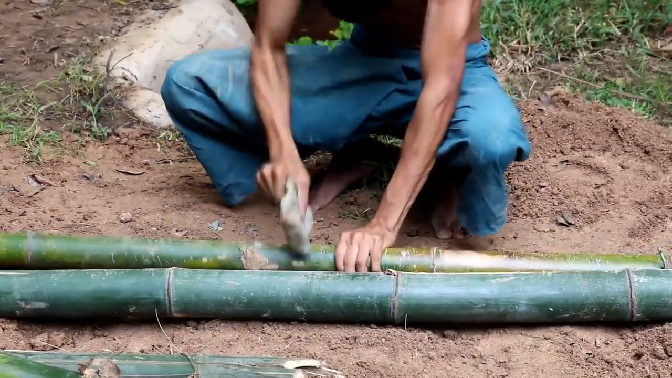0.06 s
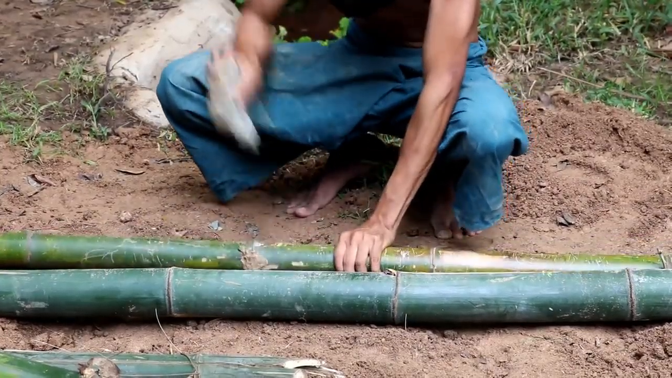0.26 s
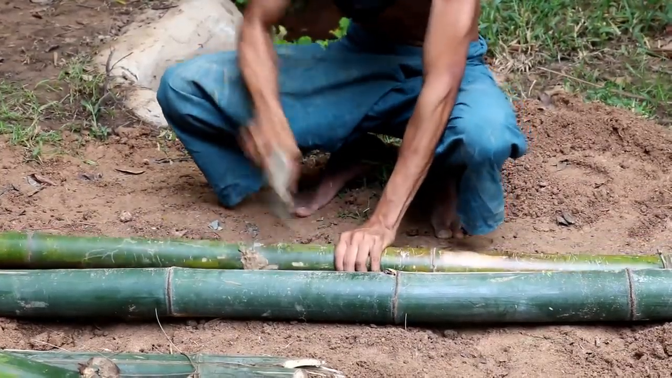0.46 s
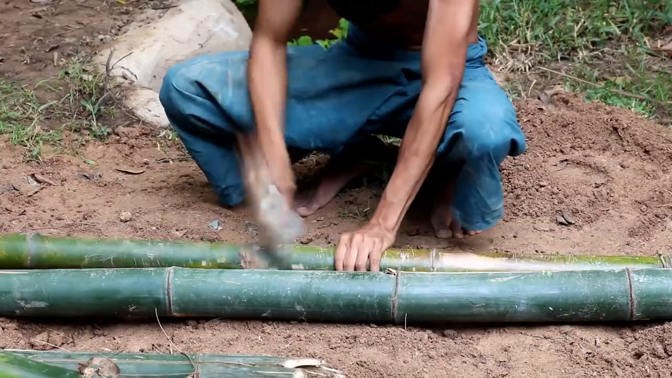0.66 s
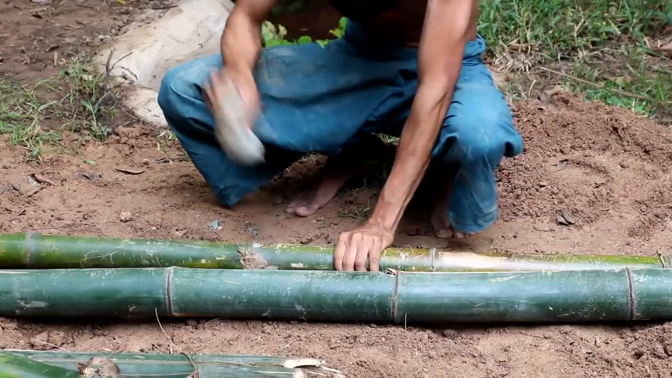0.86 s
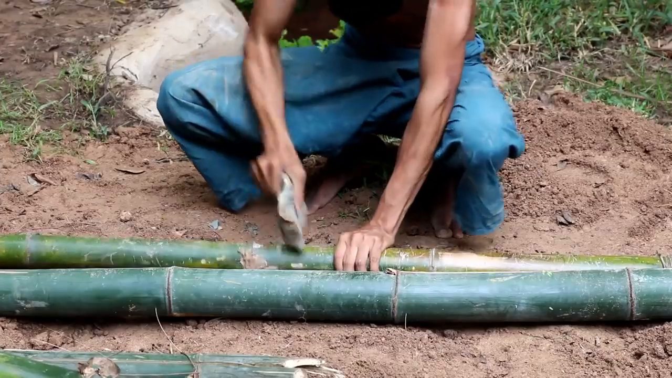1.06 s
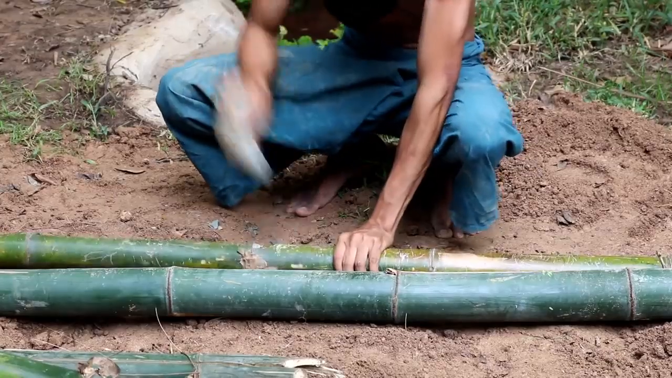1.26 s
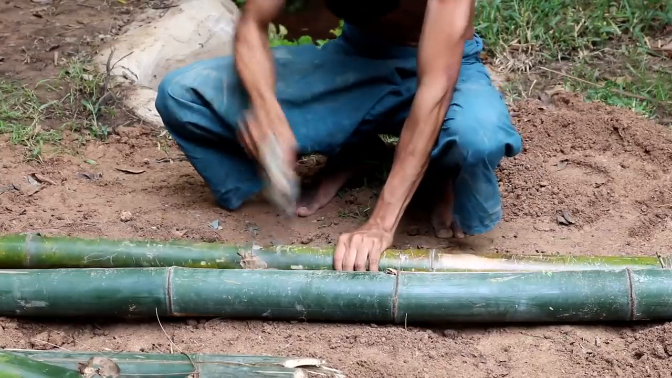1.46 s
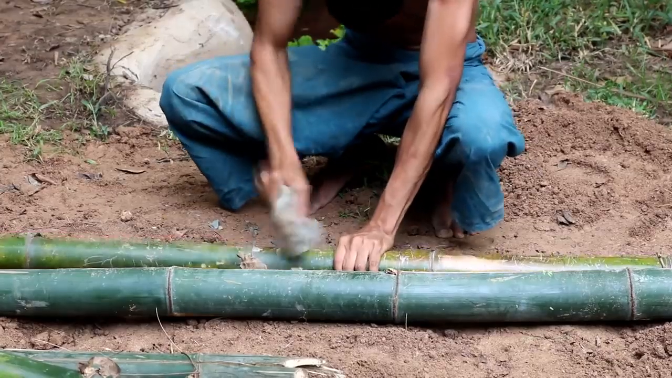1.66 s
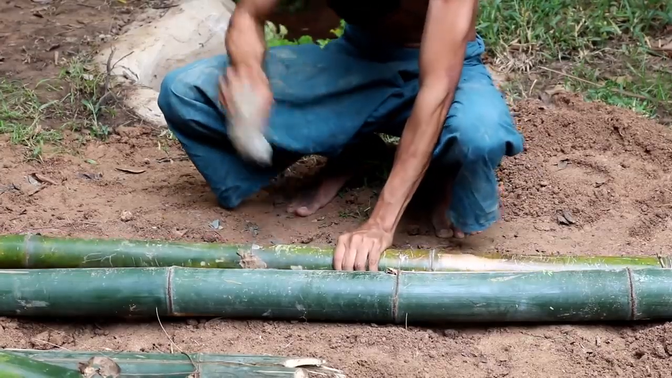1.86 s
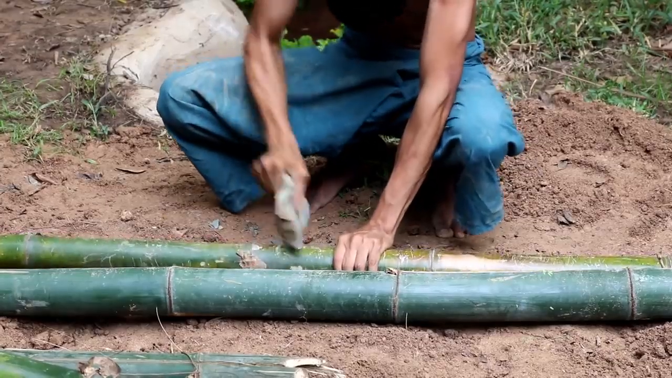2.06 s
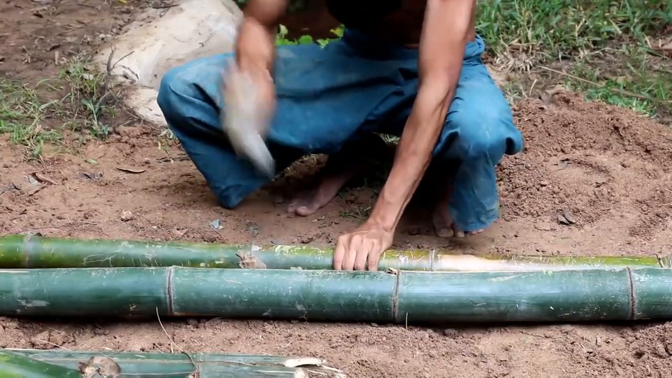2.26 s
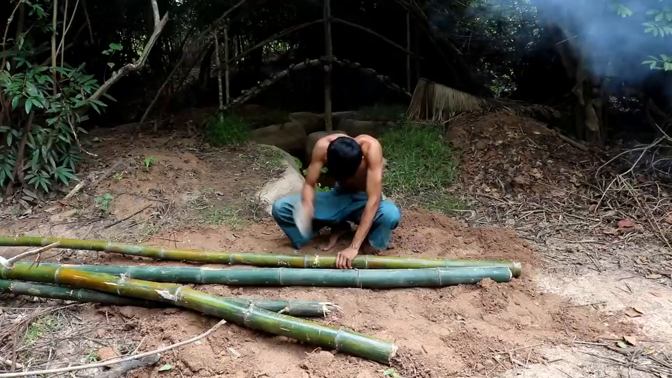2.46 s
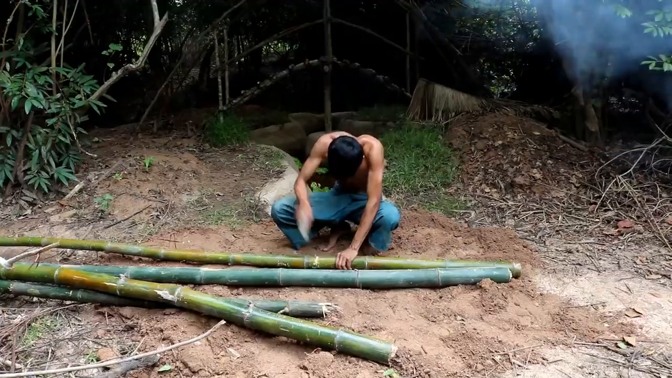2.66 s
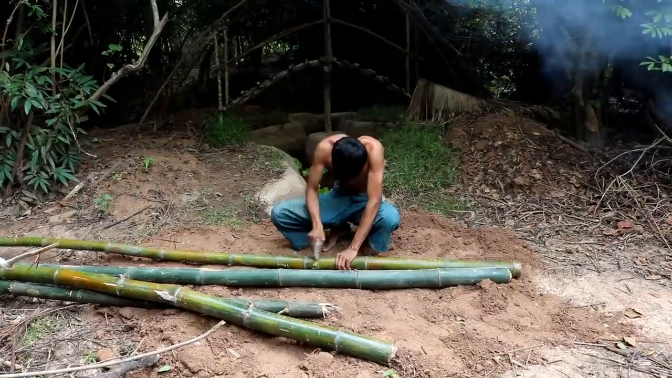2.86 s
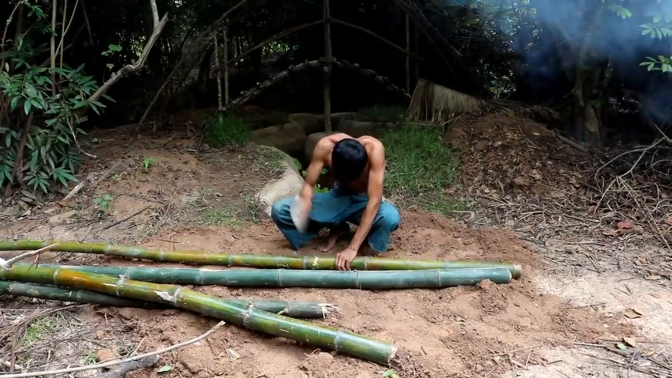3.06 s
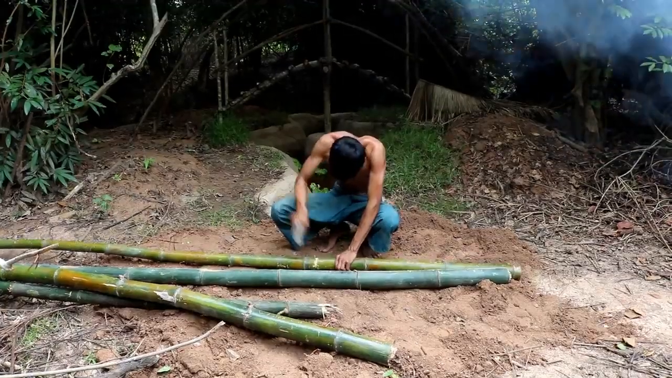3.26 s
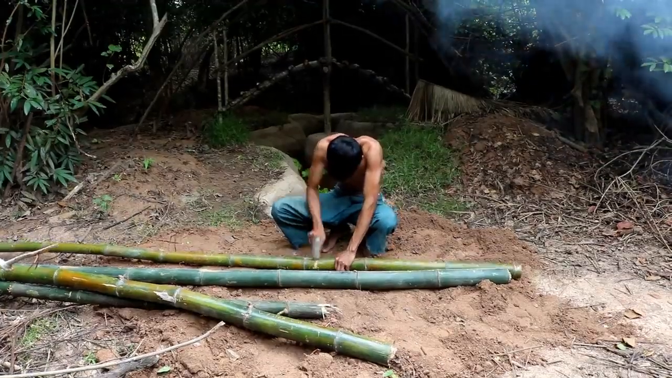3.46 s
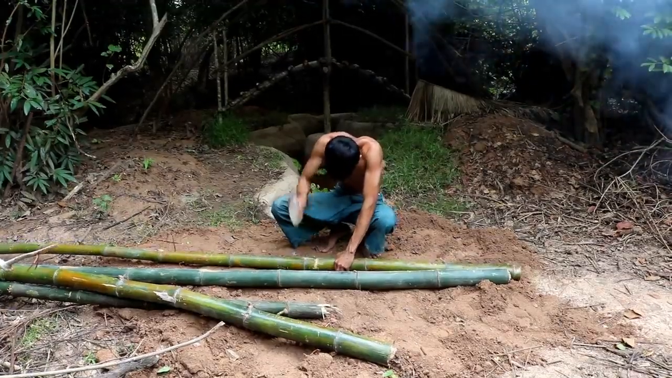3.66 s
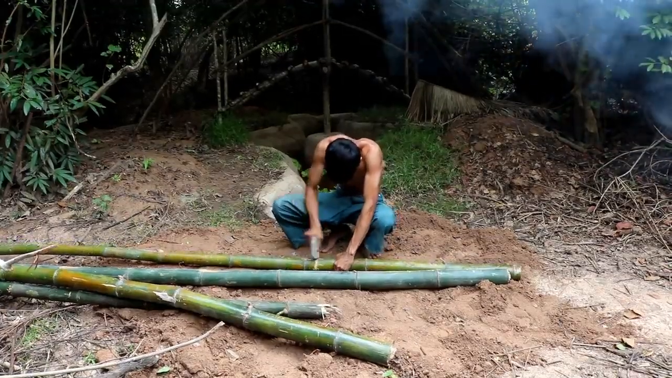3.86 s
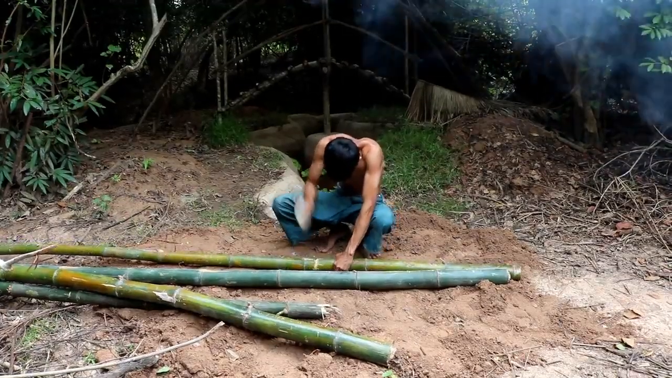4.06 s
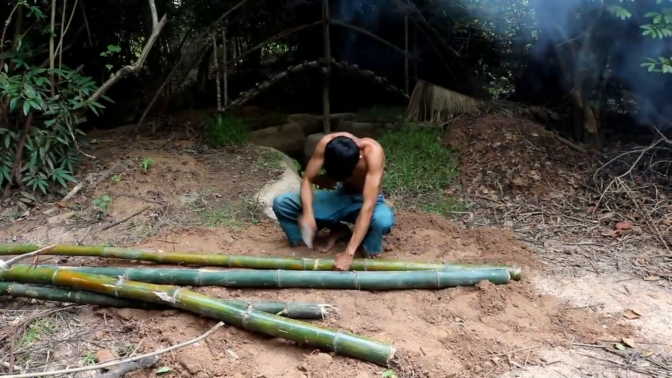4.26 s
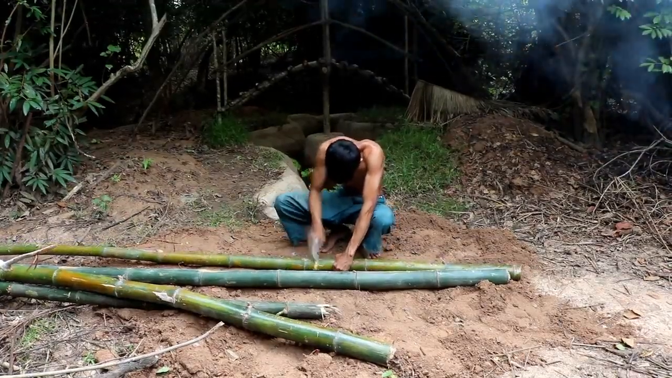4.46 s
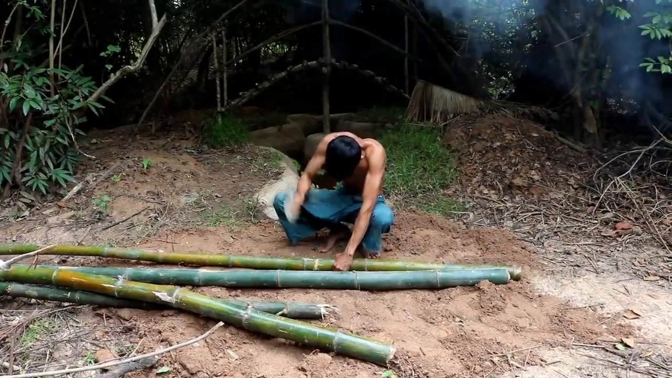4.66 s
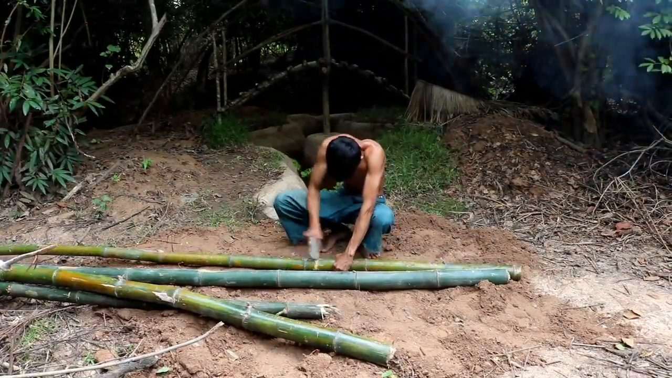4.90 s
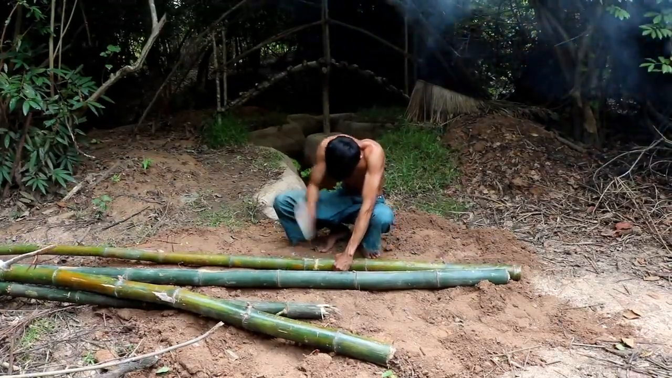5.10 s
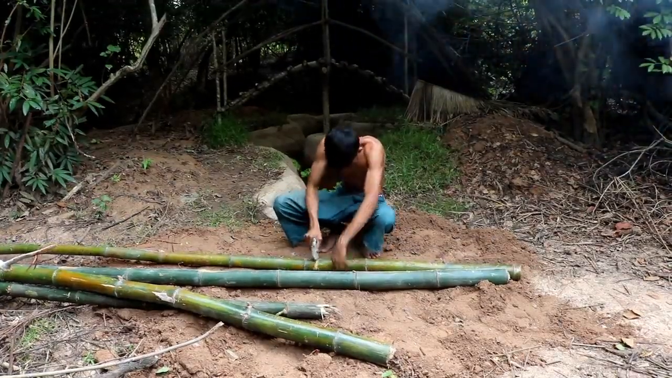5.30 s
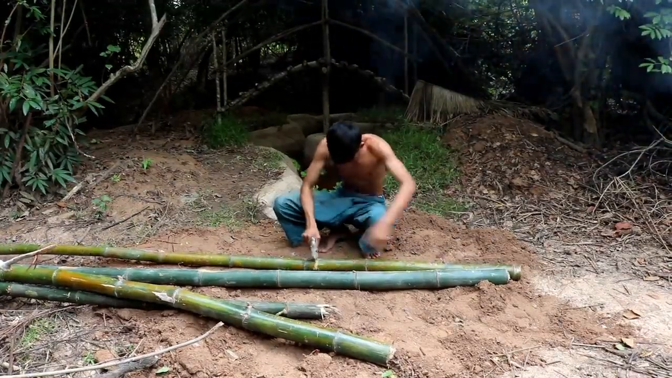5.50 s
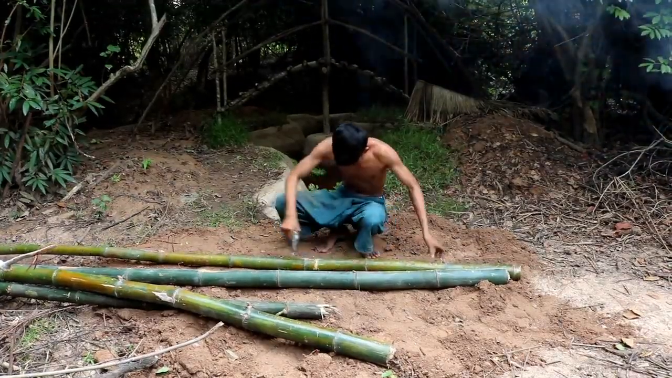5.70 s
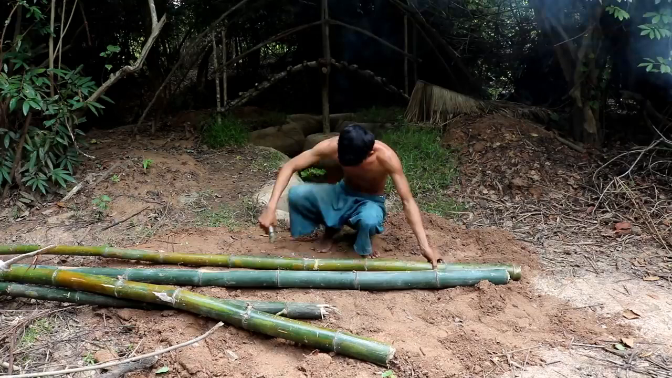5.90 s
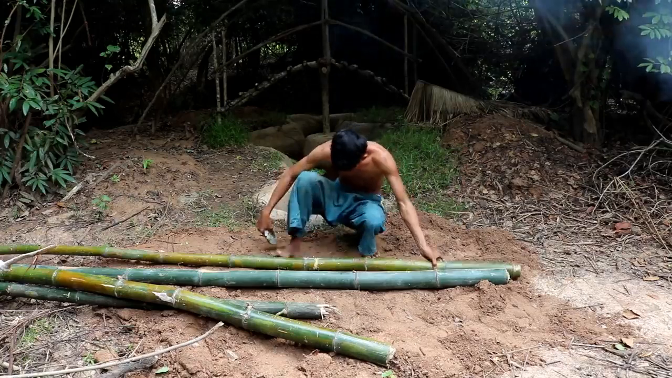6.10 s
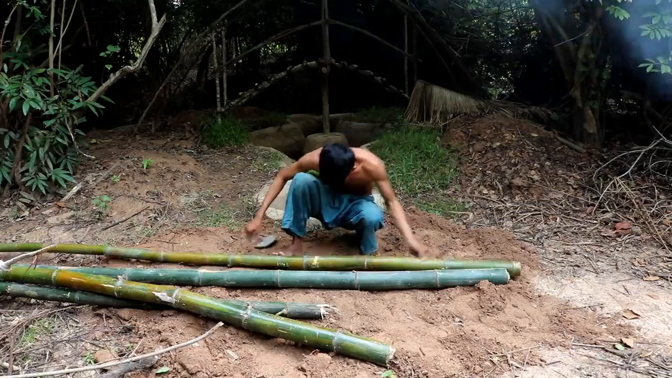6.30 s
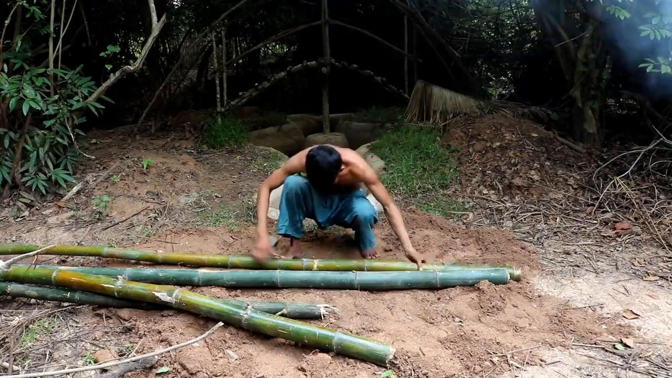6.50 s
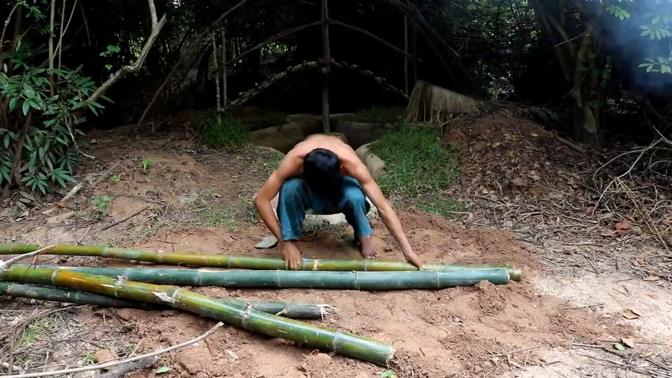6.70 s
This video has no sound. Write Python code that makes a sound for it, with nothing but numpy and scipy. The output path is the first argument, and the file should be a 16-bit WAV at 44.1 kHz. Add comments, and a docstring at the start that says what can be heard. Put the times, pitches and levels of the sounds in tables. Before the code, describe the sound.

A stone beats a hollow green bamboo pole about three times a second, loud woody knocks with short hollow rings, over faint outdoor air and insects.

```python
"""A hand-held stone beats a green bamboo pole lying on bare earth, about three blows a second.
Each blow sums a noise crack, decaying pole modes, wall noise, an earth thud and the tube's air tone.
Rebounds of the pole add clacks and duller knocks; the stone ends with a light tap.
Trees return a short noise tail. Footfalls and grit are noise puffs; air and insects are shaped noise.
Loud blows overload the microphone input."""
import sys
import numpy as np
from scipy import signal
from scipy.fft import irfft, next_fast_len
from scipy.io import wavfile
from scipy.ndimage import uniform_filter1d

SR = 44100
rng = np.random.default_rng(int(sys.argv[2]) if len(sys.argv) > 2 else 0)


def pcm_store(signal):
    """Save signal as 16-bit PCM."""
    levels = np.round(np.clip(np.atleast_2d(signal), -1, 1) * 32767)
    wavfile.write(sys.argv[1], SR, levels.astype(np.int16).T)


N = 297234
RING = SR * 6 // 10  # samples in one contact, 0.6 s

# Stone blows. Each row: start in s, force in dB, crack in dB re force, favoured pitch in Hz,
# air-column gain in dB.
BLOWS = [(0.0853, 3, -6.5, 982, -11), (0.4103, 0.5, 8.5, 978, -4), (0.745, 1, 0.5, 720, -3.5),
         (1.0723, 0.5, 5.5, 567, -4), (1.394, 0.5, 0, 620, -0.5), (1.7313, 1, -1.5, 837, 1),
         (2.0669, 0.5, 3, 1700, 1), (2.333, -8.5, 0, 369, -23), (2.601, 0.5, 2.5, 390, -23),
         (2.916, -1, 1.5, 393, -5), (3.211, -8, 11.5, 1400, -29.5), (3.5248, -3.5, 1.5, 395, -17),
         (3.8761, 0, 1, 342, -15.5), (4.211, -5, 10.5, 1246, -17.5), (4.5533, 2, -3.5, 925, -12),
         (4.8795, -0.5, 0, 620, -22), (5.1932, -3, 6.5, 1510, -26)]
# Pole dropping back. Each row: start in s, force in dB, favoured pitch in Hz.
REBOUNDS = [(0.437, -17, 940), (1.102, -15.5, 860), (1.438, -14, 620), (1.777, -11.5, 1830),
            (2.3617, -9, 805), (2.632, -1, 1670), (2.65, -7, 380), (2.677, -12.5, 880), (2.95, -16.5, 1100),
            (3.048, -16, 1420), (3.2468, -5, 810), (3.274, -12.5, 810), (3.3315, -21.5, 810),
            (3.5664, -9.5, 1030), (3.9025, -1, 910), (4.2409, -5, 1010), (4.5786, -3.5, 900),
            (4.896, -5, 303), (4.9143, -5, 650), (5.226, -8, 540)]
# Pole modes. Each row: nominal frequency in Hz, relative level in dB struck at place 0,
# the same at place 1, t60 in s before the knock's common fade.
POLE_MODES = [(130, -17.5, -25, 0.43), (174, -17.5, -16, 0.27), (204.8, -24.5, -17.5, 0.28),
              (227, -23.5, -5, 0.16), (259.4, -16.5, -10, 0.16), (300, -17, -11.5, 0.13),
              (380.3, -8, -3, 0.13), (418.8, -5, -4.5, 0.12), (517.3, -15, -5, .17), (554, -1.5, -13, 0.22),
              (596, -22, -7.5, 0.27), (624.5, -5.5, -10.5, 0.2), (714, -6.5, -5.5, 0.22),
              (811.2, -5.5, -4, 0.17), (871.4, 0.5, -6, 0.12), (939, -9, 3, 0.032), (932, -7, -7.5, 0.19),
              (1018, -3, -6.5, 0.15), (1048, -15, -20, 0.071), (1221, -13.5, -3, 0.098),
              (1362, -11.5, -9, 0.17), (1410, -3, -6.5, 0.11), (1535, -4.5, -7.5, 0.096),
              (1742, -5.5, -12.5, 0.15), (1903, -4.5, -10, 0.11), (2452, 0, -13.5, 0.14),
              (2564, 14, -10, 0.031), (2680, -4, -17.5, 0.046), (2806, -16, -16.5, 0.28)]
# Dense ring of the fibrous wall. Each row: frequency in Hz, relative level in dB per Hz.
WALL_SPECTRUM = [(150, -20.5), (350, -7), (600, -5), (950, 2), (1500, -1.5), (2100, -4.5), (2600, -8.5),
                 (3500, -15.5), (6000, -23.5), (10000, -36), (16000, -48)]
# Wall decay. Each row: frequency in Hz, t60 in s before the common fade.
WALL_T60_S = [(200, 0.45), (900, 0.17), (2500, 0.22), (9000, 0.35)]
# Crack of the contact. Each row: frequency in Hz, relative level in dB per Hz.
CRACK_SPECTRUM = [(200, -8.5), (900, 3), (2500, 3.5), (4500, -0.5), (7500, -6), (11000, -18), (16000, -27)]
# Push into the earth. Each row: frequency in Hz, relative level in dB per Hz.
THUD_SPECTRUM = [(20, -12), (50, -13.5), (90, -5), (140, 3), (300, 6.5), (500, 3), (1000, -28),
                 (4000, -62.5)]
# Drive into the earth over time. Each row: time in s, gain in dB before the crack's share.
THUD_DRIVE = [(0, -10.5), (0.75, -4), (1.7, -2.5), (3.2, 5), (4.6, 4.5), (5.2, -0.5)]
# Scatter from trees and ground. Each row: frequency in Hz, relative level in dB per Hz.
WOODS_SPECTRUM = [(60, -14), (200, -9), (700, -3.5), (1500, -3.5), (2800, 3.5), (5000, 0.5), (7500, -4.5),
                  (10000, -8), (15000, -22)]
# Scatter decay. Each row: frequency in Hz, t60 in s before the common fade.
WOODS_T60_S = [(150, 0.56), (800, 0.69), (3000, 0.41), (7000, 0.37), (14000, 0.23)]
# Soft footfalls on earth. Each row: start in s, level in dB.
STEPS = [(3.478, -31), (6.13, -43.5), (6.235, -49.5), (6.328, -39)]
# Grit scraping underfoot. Each row: start in s, length in s (three times the rise), level in dB.
SCUFFS = [(6.091, 0.022, -44.5), (6.279, 0.077, -48), (6.466, 0.007, -43), (6.533, 0.017, -48.5)]
# Still outdoor air. Each row: frequency in Hz, relative level in dB per Hz.
AIR_SPECTRUM = [(15, -62), (25, -36), (49, -18), (130, -15), (285, -17.5), (405, -16.5), (575, -17),
                (624, -18), (818, -20), (1440, -21.5), (2550, -23.5), (3250, -23), (6380, -27.5),
                (7710, -27), (16000, -40)]
# Air level over time. Each row: time in s, level in dB.
AIR_LEVEL = [(0, -49), (2.3, -53.5), (2.4, -46), (5.5, -52), (6.7, -51.5)]
# Insect bands. Each row: start in s, end in s, centre in Hz, width in Hz, mean level in dB.
INSECTS = [(0, 2.33, 8960, 130, -57.5), (0, 2.33, 8730, 380, -62), (0, 2.33, 6350, 200, -70),
           (0, 6.74, 5400, 700, -66), (2.33, 6.74, 7800, 900, -73)]
# Channel correlation of sound straight from the contact. Each row: frequency in Hz, correlation -1 to 1.
DIRECT = [(30, 0.37), (130, 1), (700, 1), (2000, 0.96), (6000, 0.22), (12000, 1)]
# Channel correlation of scattered sound. Each row: frequency in Hz, correlation -1 to 1.
SCATTERED = [(30, 0.8), (130, 0.7), (280, 0.8), (500, 0.8), (1000, 0.5), (2000, -0.023), (4000, -0.026),
             (9000, 0.1)]


def hammering():
    """Contact sounds add up: blows, landings of the hopping pole and the last tap."""
    out = np.zeros((2, N))
    for start_s, *row in BLOWS:
        add(out, start_s, blow(start_s, *row))
    for start_s, *row in REBOUNDS:
        add(out, start_s, landing(start_s, *row))
    rest_s = 5.342
    add(out, rest_s, resting_tap(rest_s))
    return out


def spot(s):
    """The stone works one spot, then another: place 0-1, favoured-mode lift in dB, landing clack in dB."""
    move_s = 2.2
    return (0.2, 2, -1) if s < move_s else (0.84, 6.5, 8)


def blow(s, force_db, crack_db, favoured_hz, column_db):
    """A sharper blow singles out its modes more and thuds harder; trees and tube answer."""
    place, lift_db, _ = spot(s)
    lift_per_crack, thud_per_crack = 0.88, 0.43  # dB per dB
    thud_db = np.interp(s, *np.transpose(THUD_DRIVE)) + thud_per_crack * crack_db
    struck = knock(crack_db, thud_db, place, favoured_hz, lift_db + lift_per_crack * crack_db)
    return amp(force_db) * (struck + woods(crack_db, place)) + amp(column_db) * air_column()


def landing(s, force_db, favoured_hz, knock_db=-2):
    """The pole falls back: harder is brighter, soft is mostly clack."""
    place, _, clack_db = spot(s)
    crack_per_force, clack_per_force = 0.99, 0.64  # dB per dB
    crack_db = crack_per_force * force_db
    struck = amp(knock_db) * knock(crack_db, thud_db=-5.5, place=place, favoured_hz=favoured_hz, lift_db=8.5)
    clacking = amp(clack_db + clack_per_force * force_db) * clack()
    return amp(force_db) * (struck + woods(crack_db, place)) + clacking


def resting_tap(s, level_db=-37, crack_db=20):
    """The stone comes to rest on the pole: a light, bright contact, nearly all crack."""
    place, lift_db, _ = spot(s)
    struck = knock(crack_db, thud_db=8, place=place, favoured_hz=1200, lift_db=lift_db)
    return amp(level_db) * (struck + woods(crack_db, place))


def knock(crack_db, thud_db, place, favoured_hz, lift_db,
          modes_db=-5, wall_db=-6, snap_db=6, splinter_db=-7, earth_db=-12):
    """One contact: hard snap, splintery scatter, ringing modes and wall, thud into the earth."""
    snap = amp(snap_db + crack_db) * fibres(DIRECT) * fade(t60_s=0.018, rise_s=0.001)
    splinter = amp(splinter_db + crack_db) * fibres(SCATTERED) * fade(t60_s=0.083, rise_s=0.0069)
    splinter *= grain(depth_db=3)
    tube = amp(modes_db) * pole(place, favoured_hz, lift_db) * fade(t60_s=0.71, rise_s=0.00045)
    wall = amp(wall_db + 0.34 * crack_db) * dying(WALL_SPECTRUM, WALL_T60_S)
    wall *= fade(t60_s=1.3, rise_s=0.00083) * grain(depth_db=1.0)
    thud = amp(earth_db + thud_db) * coloured(THUD_SPECTRUM, RING, DIRECT)
    thud *= fade(t60_s=0.15, rise_s=0.0022)
    return snap + splinter + tube + wall + thud


def fibres(likeness, ripple_db=5.0):
    """Bamboo-fibre crack: every contact draws its own ripple of spectral peaks."""
    knots_hz = np.linspace(0, SR / 2, num=90)
    ripple = ripple_db * rng.standard_normal(len(knots_hz))
    return noise(lambda hz: amp(read(CRACK_SPECTRUM, hz) + np.interp(hz, knots_hz, ripple)), RING, likeness)


def pole(place, favoured_hz, lift_db, scatter_db=1.64, detune=0.007, spread_hz=1100,
         octaves=0.14, swell_s=0.0026, diffuse_s=0.01):
    """Modes weighted by contact place ring for 0.3 s, soon out of step between the channels."""
    hz, first_db, second_db, t60_s = np.transpose(POLE_MODES)[:, :, None]
    size, tune, apart = rng.standard_normal((3, len(POLE_MODES), 1))
    t = np.arange(RING // 2) / SR
    place = np.clip(place, 0, 1)

    # each contact favours one group of modes
    near = np.exp(-0.5 * (np.log2(hz / favoured_hz) / octaves) ** 2)
    place_db = first_db + place * (second_db - first_db)
    height = amp(place_db + lift_db * near + scatter_db * size)

    tuned_hz = hz * (1 + detune * tune)
    start_phase = 2 * np.pi * rng.random(hz.shape)
    ring = np.exp((2j * np.pi * tuned_hz - np.log(1000) / t60_s) * t + 1j * start_phase)
    # low bending waves are slower and build later
    build_s = swell_s * np.sqrt(spread_hz / hz)
    ring *= height * (1 - np.exp(-t / build_s))

    phase_gap = apart * np.minimum(hz / spread_hz, 2)
    wide = np.exp(1j * phase_gap * [-0.5, 0.5]).T @ ring
    straight = np.exp(-t / diffuse_s)
    stereo = (straight * ring.sum(0) + (1 - straight) * wide).imag
    return np.pad(stereo, ((0, 0), (0, RING - len(t))))


def air_column(hz=233.0, level_db=-6.0):
    """Air in the tube swells slowly into a hooting sine."""
    turns = hz * np.arange(RING) / SR + rng.random()
    swell = fade(t60_s=0.7, rise_s=0.044) ** 2  # squaring halves the decay time
    return amp(level_db) * np.sin(2 * np.pi * turns) * swell * np.ones((2, 1))


def clack(hz=900, level_db=5, echo_db=-14):
    """A landing pole gives a few strong cycles, fast bending waves first, then a far-end echo."""
    t = np.arange(RING) / SR
    glide_s, echo_s = 0.0007, 0.0085
    turns = hz * (t + glide_s * (1 - np.exp(-t / glide_s)))  # pitch falls from 2 * hz to hz
    pulse = amp(level_db) * np.sin(2 * np.pi * turns) * fade(t60_s=0.008, rise_s=0.0006)
    echo = np.interp(t - echo_s, t, pulse, left=0)
    return (pulse + amp(echo_db) * echo) * np.ones((2, 1))


def woods(crack_db, place, level_db=-21, far_db=3.5):
    """Leaves and trunks send back a soft, wide tail, stronger towards place 1."""
    tail = dying(WOODS_SPECTRUM, WOODS_T60_S) * fade(t60_s=3.5, rise_s=0.0061) * grain(depth_db=0.5)
    return amp(level_db + 0.9 * crack_db + far_db * place) * tail


def scuffs():
    """Soft low footfalls and broadband gritty scrapes, each a noise puff."""
    out = np.zeros((2, N))
    for start_s, level_db in STEPS:
        add(out, start_s, amp(level_db) * rub(length_s=0.019, hz=135, width_hz=120))
    for start_s, length_s, level_db in SCUFFS:
        add(out, start_s, amp(level_db) * rub(length_s, hz=3500, width_hz=13600))
    return out


def rub(length_s, hz, width_hz):
    """A puff of noise that peaks at a third of its length, then dies."""
    u = 3 * np.arange(RING) / SR / length_s
    return band(hz, width_hz, RING) * u * np.exp(1 - u)


def outdoors():
    """A quiet wash of air noise under the insects."""
    t = np.arange(N) / SR
    level_db = np.interp(t, *np.transpose(AIR_LEVEL))
    air = amp(level_db) * coloured(AIR_SPECTRUM, next_fast_len(N))[:, :N]
    return air + insects(t)


def insects(t):
    """Narrow and broad noise bands hiss with a slight random waver in level."""
    out = np.zeros((2, N))
    for start_s, end_s, hz, width_hz, level_db in INSECTS:
        waver_db = np.interp(t, np.linspace(0, t[-1], num=80), rng.standard_normal(size=80))
        active = (t > start_s) & (t < end_s)
        singing = uniform_filter1d(1.0 * active, size=1500)  # softened ends
        out += amp(level_db + waver_db) * singing * band(hz, width_hz, next_fast_len(N))[:, :N]
    return out


def noise(gain, size, likeness=SCATTERED):
    """Stereo noise of rms 1, spectrum gain(Hz); mid/side balance sets channel correlation."""
    hz = np.fft.rfftfreq(size, 1 / SR)
    mid, side = np.exp(2j * np.pi * rng.random((2, len(hz))))
    alike = np.clip(read(likeness, hz), -1, 1)
    mid = mid * np.sqrt(1 + alike)
    side = side * np.sqrt(1 - alike)
    return unit(irfft(np.array([mid + side, mid - side]) * gain(hz), size))


def coloured(spectrum, size, likeness=SCATTERED):
    """Noise shaped by (Hz, dB) points."""
    return noise(lambda hz: amp(read(spectrum, hz)), size, likeness)


def band(centre_hz, width_hz, size):
    """Noise in one resonance."""
    return noise(lambda hz: 1 / (1 + ((hz - centre_hz) / (width_hz / 2)) ** 4), size)


def dying(spectrum, t60_points):
    """A dense ring in which each frequency dies at its own speed."""
    hz, t, bins = signal.stft(coloured(spectrum, RING), SR, nperseg=256)
    decay = np.exp(-np.log(1000) * t / read(t60_points, hz)[:, None])
    return signal.istft(bins * decay, SR, nperseg=256)[1][:, :RING]


def fade(t60_s, rise_s):
    """Contact envelope: exponential rise and fall."""
    t = np.arange(RING) / SR
    return (1 - np.exp(-t / rise_s)) * np.exp(-np.log(1000) * t / t60_s)


def grain(depth_db):
    """Uneven gain with random knots 2 ms apart, as splinters and single echoes arrive."""
    knots = np.linspace(0, RING, num=300)
    wander = np.interp(np.arange(RING), knots, rng.standard_normal(len(knots)))
    return unit(amp(depth_db * wander))


def amp(db):
    """Decibels to amplitude ratio."""
    return 10 ** (np.asarray(db) / 20)


def unit(x):
    """Scales to rms 1."""
    return x / np.sqrt(np.mean(x ** 2) + 1e-20)


def read(points, hz):
    """Joins (Hz, value) points on a log-frequency axis."""
    f, value = np.transpose(points)
    return np.interp(np.log(hz + 1), np.log(f), value)


def add(mix, start_s, sound):
    """Adds a sound in place, cut at the end of the mix."""
    part = mix[:, round(start_s * SR):][:, :sound.shape[1]]
    part += sound[:, :part.shape[1]]


def scene():
    """Stone and pole, feet, then open air and insects."""
    return hammering() + scuffs() + outdoors()


def record(dry, ceiling=1.0, edge_hz=15700):
    """The input overloads with a firm knee; a low-pass then limits the band."""
    clipped = dry / (1 + (dry / ceiling) ** 8) ** (1 / 8)
    lowpass = signal.firwin(255, edge_hz, window=("kaiser", 8), fs=SR)
    return signal.oaconvolve(clipped, lowpass[None], "same", axes=1)


dry = scene()
out = record(dry)
pcm_store(out)
```